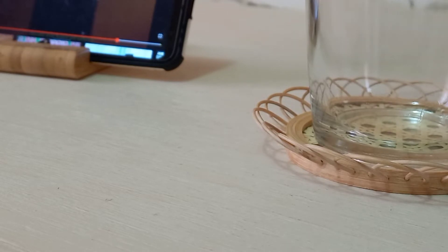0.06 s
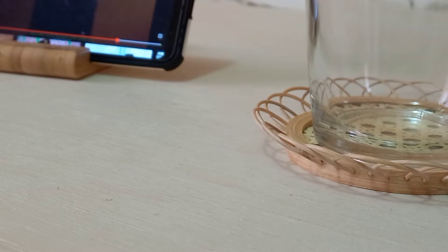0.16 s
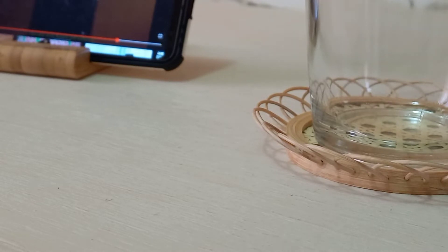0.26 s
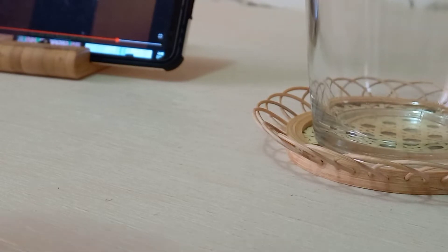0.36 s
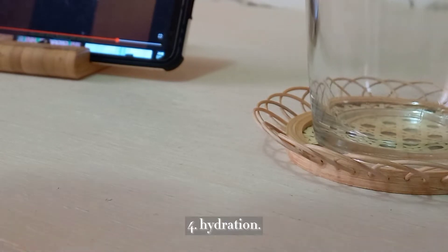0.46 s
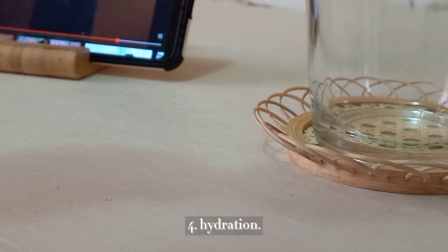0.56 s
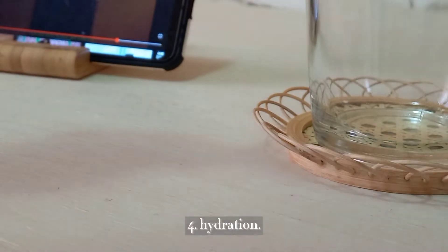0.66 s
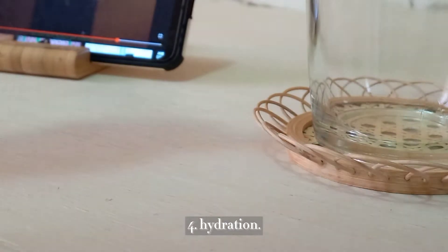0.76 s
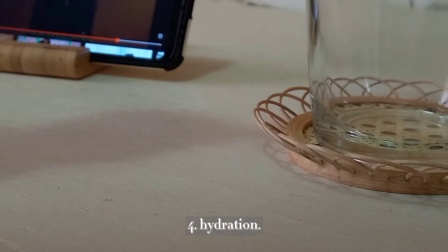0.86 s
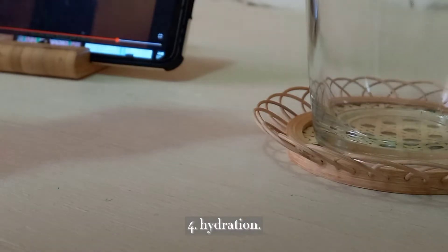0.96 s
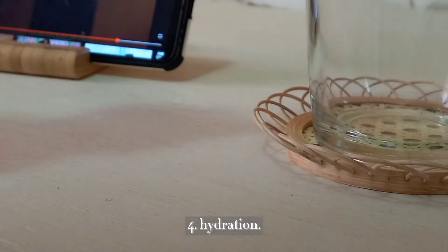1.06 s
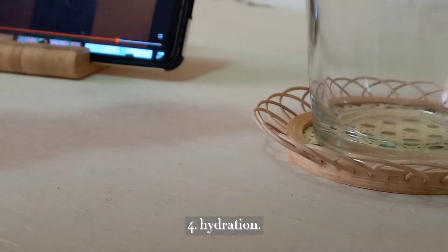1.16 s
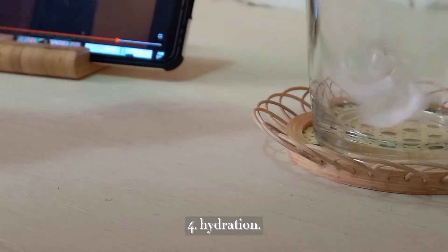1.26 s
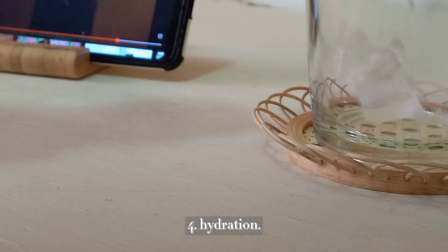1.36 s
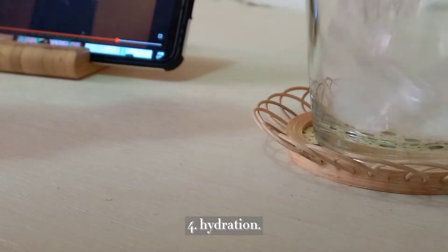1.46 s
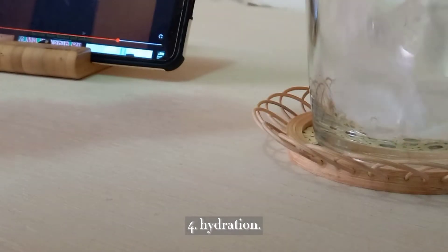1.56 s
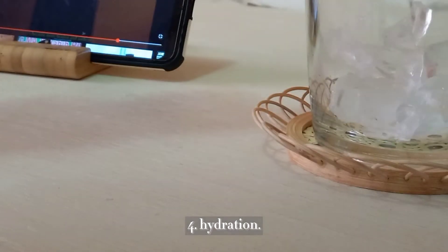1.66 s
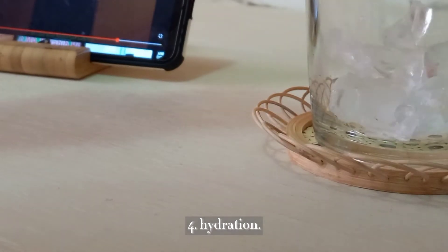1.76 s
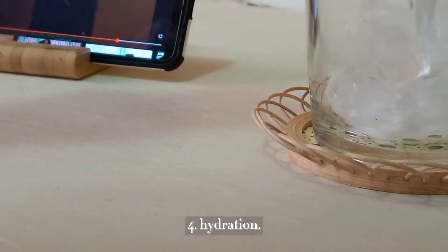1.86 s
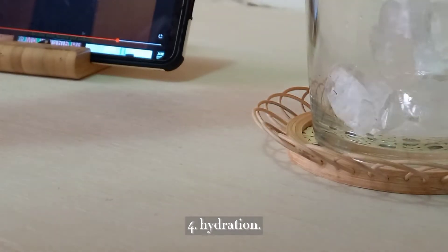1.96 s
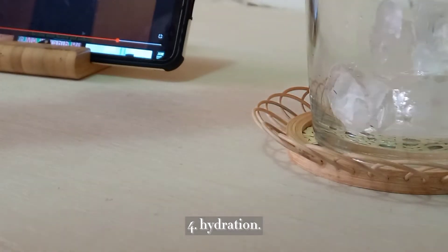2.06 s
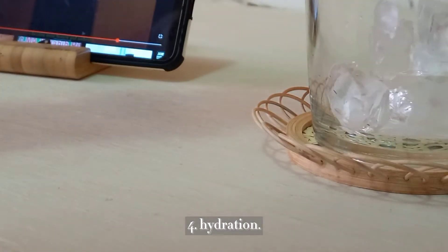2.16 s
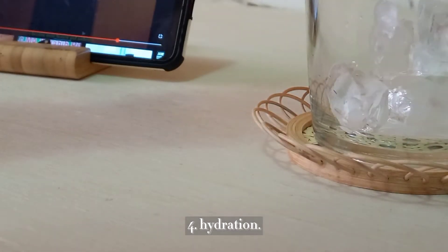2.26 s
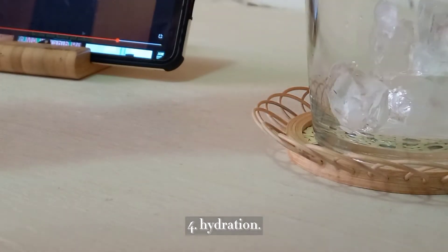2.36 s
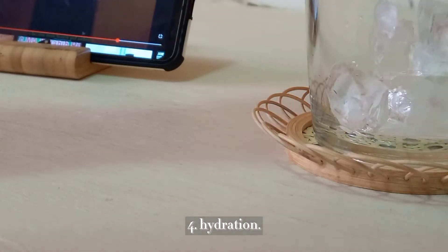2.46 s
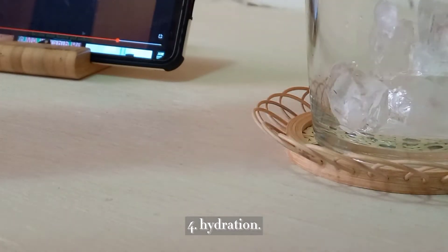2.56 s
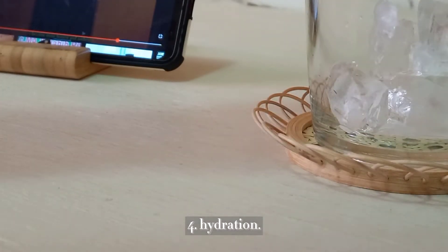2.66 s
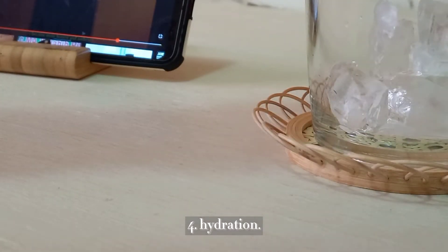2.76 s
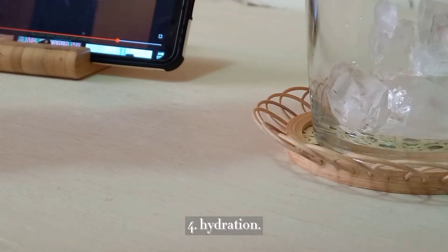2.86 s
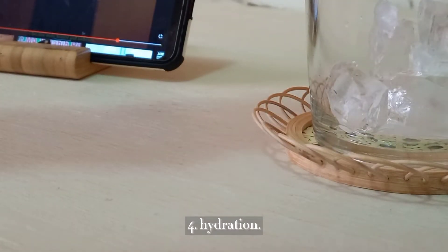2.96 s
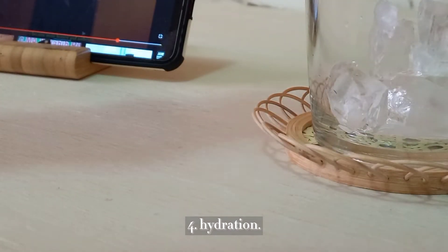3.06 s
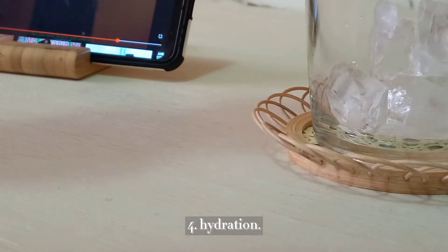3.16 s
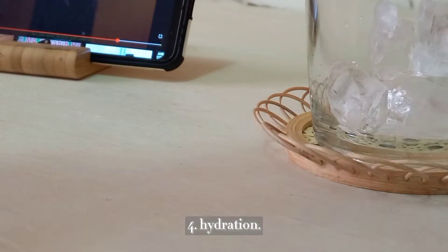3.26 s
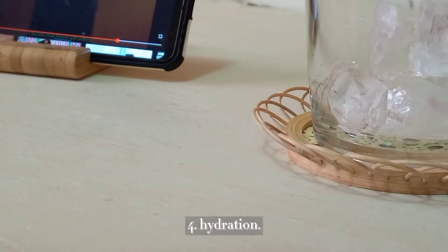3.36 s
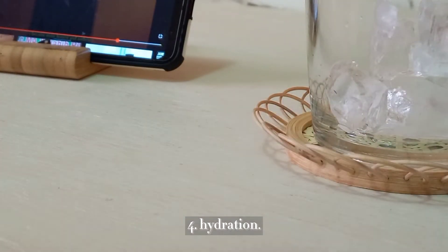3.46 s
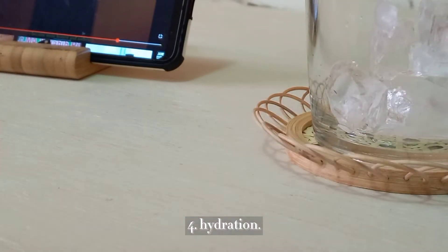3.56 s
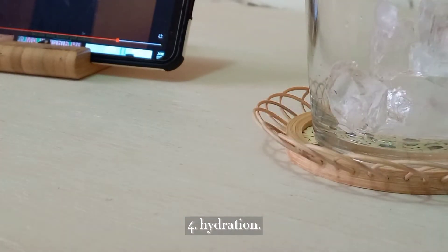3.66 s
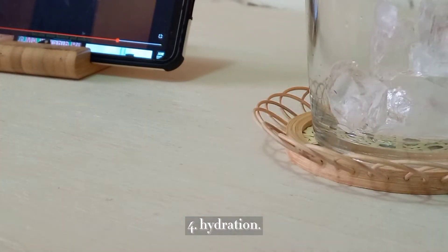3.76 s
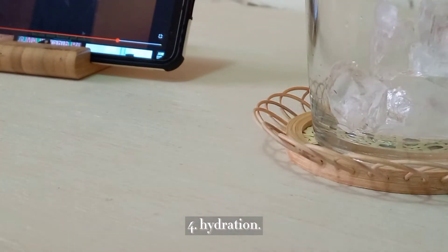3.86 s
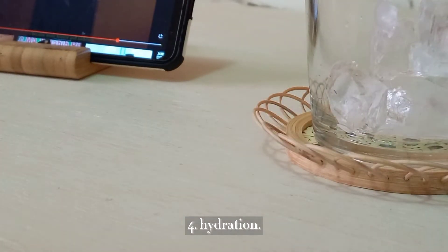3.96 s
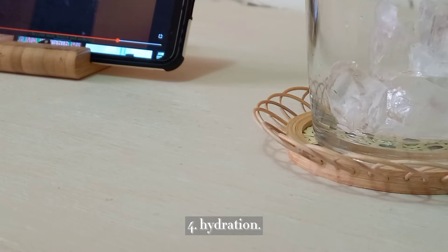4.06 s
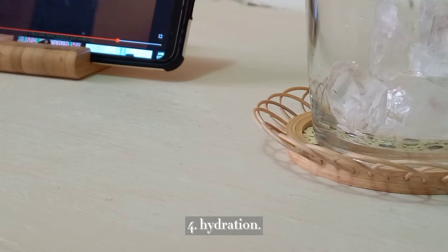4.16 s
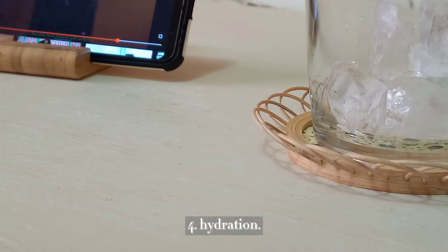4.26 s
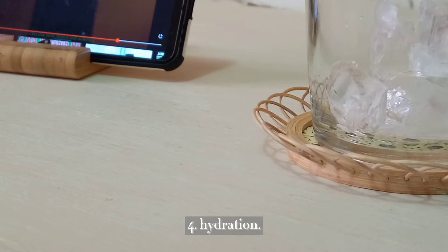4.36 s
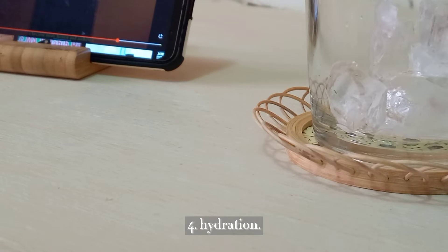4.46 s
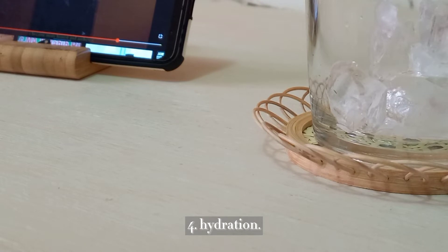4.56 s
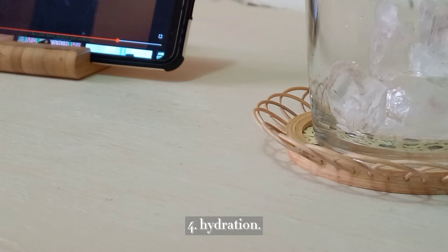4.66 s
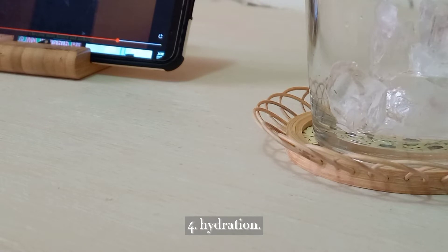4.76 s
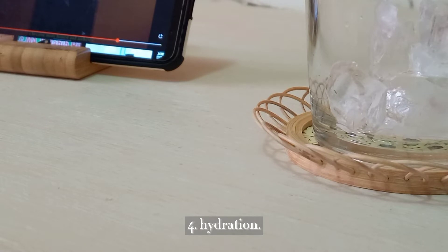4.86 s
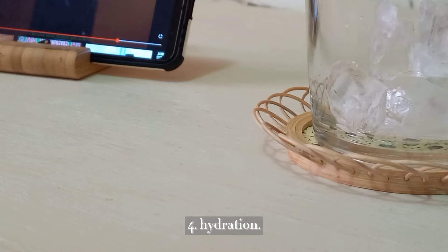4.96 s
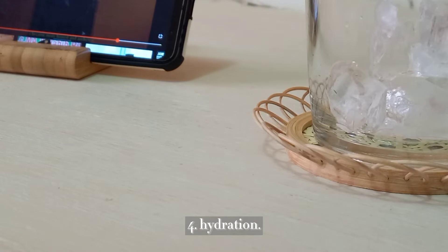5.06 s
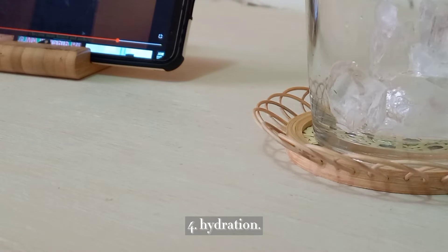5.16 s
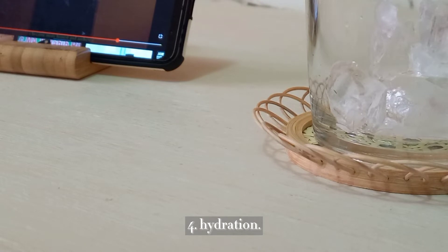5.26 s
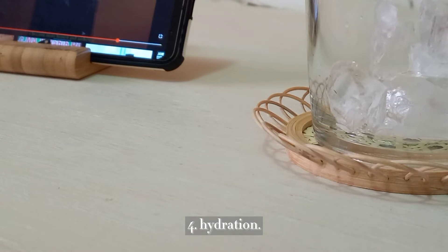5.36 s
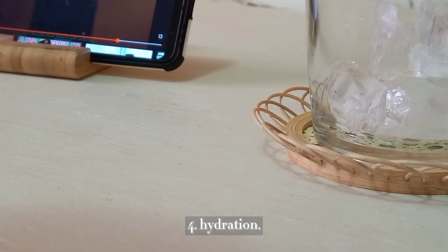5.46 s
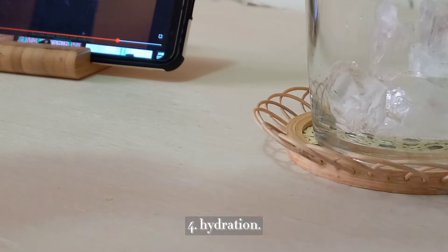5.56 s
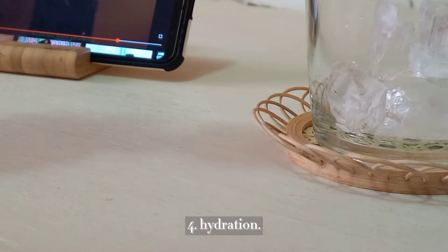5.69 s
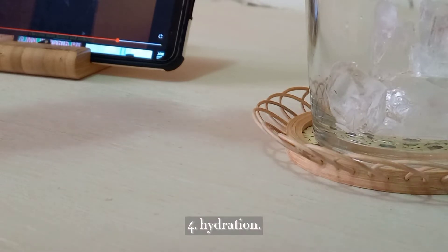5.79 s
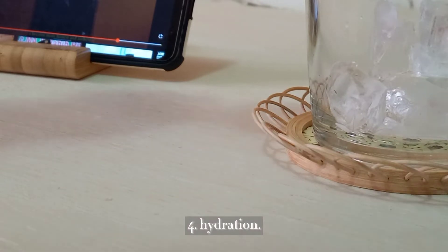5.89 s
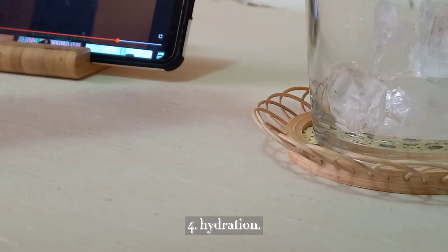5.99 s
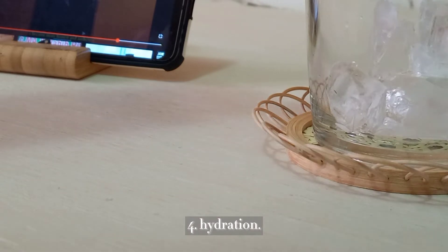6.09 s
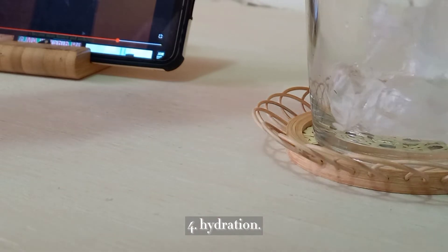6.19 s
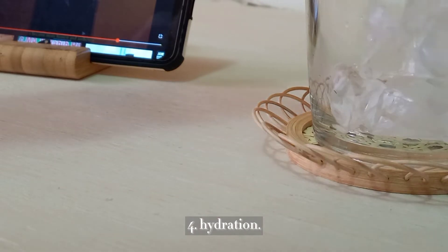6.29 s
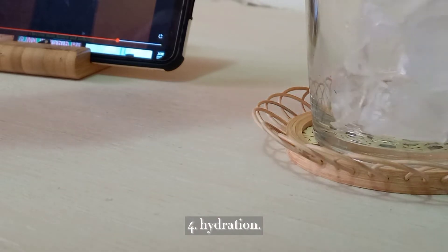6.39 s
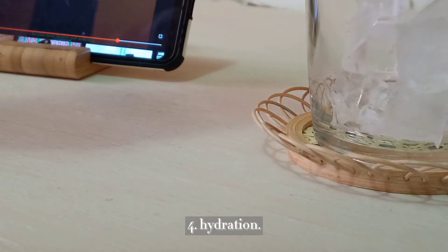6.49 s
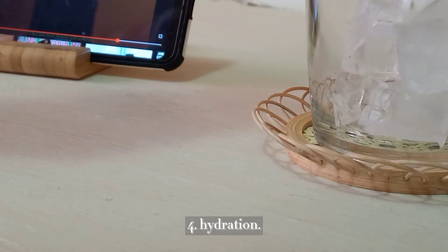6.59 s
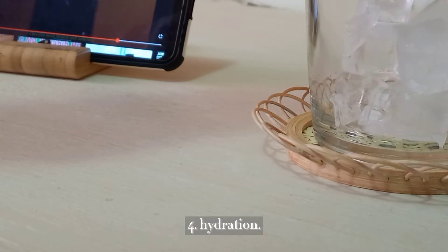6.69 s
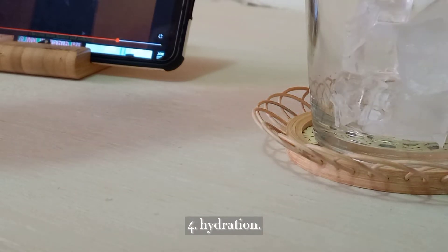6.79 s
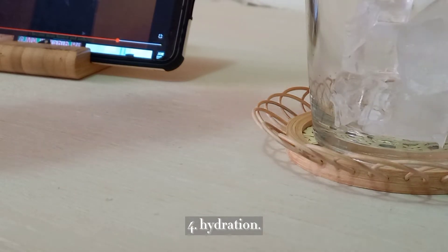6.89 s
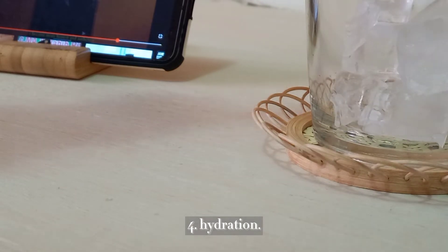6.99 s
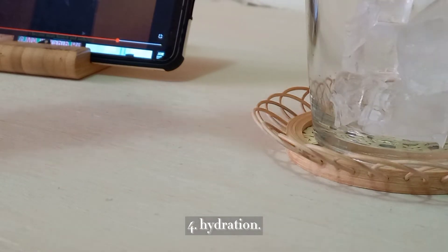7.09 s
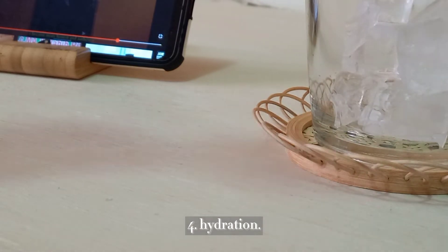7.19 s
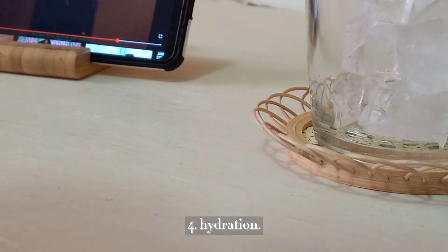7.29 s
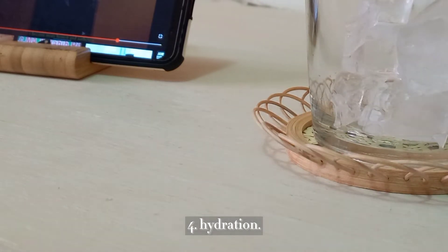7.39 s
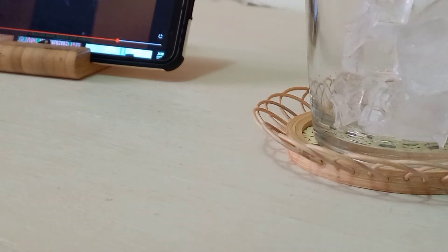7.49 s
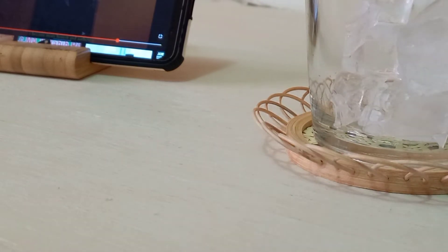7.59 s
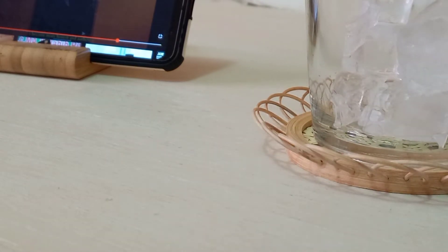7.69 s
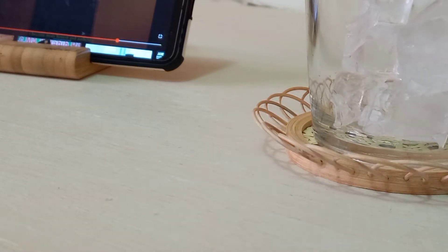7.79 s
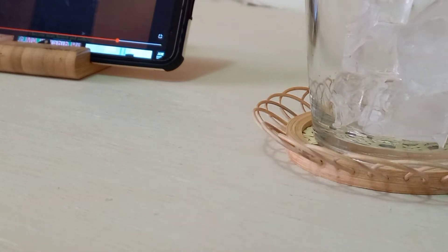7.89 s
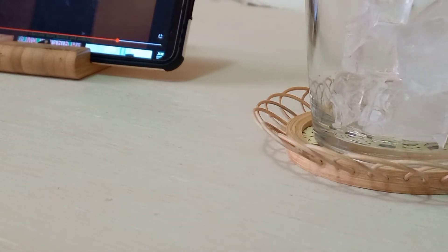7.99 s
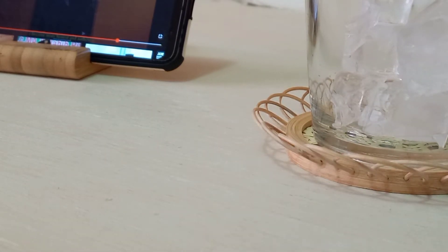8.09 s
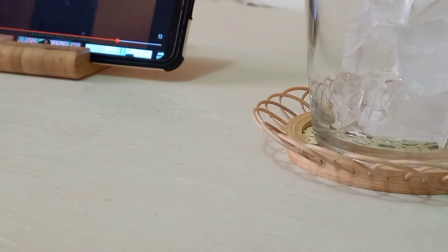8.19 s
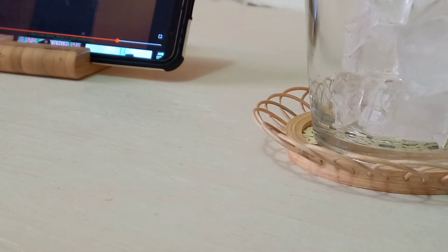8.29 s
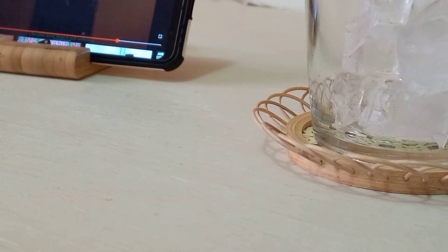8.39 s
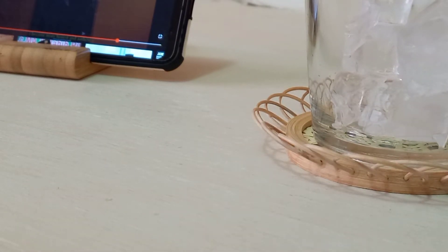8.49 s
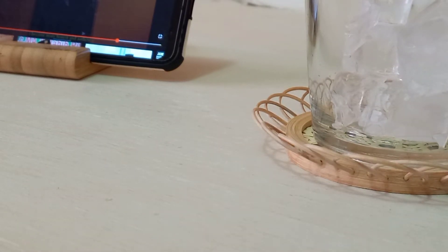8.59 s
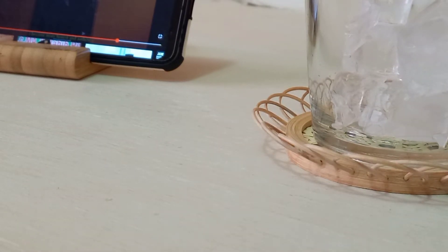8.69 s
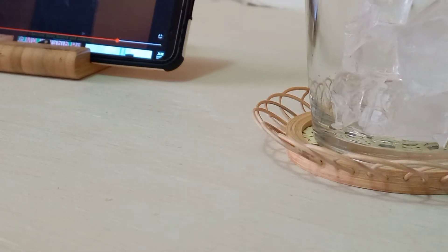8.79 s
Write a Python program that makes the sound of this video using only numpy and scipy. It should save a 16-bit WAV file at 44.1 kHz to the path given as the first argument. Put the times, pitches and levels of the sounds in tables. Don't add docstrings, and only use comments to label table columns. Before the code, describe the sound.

Very close in a quiet kitchen, a soft thud comes first, then a handful of ice cubes drops into a glass, with clear rings, knocks and a brief slide. After a pause, a scoop digs noisily in a plastic bin of ice. A second, shorter handful clinks into the glass, and near the end the scoop digs again. A faint refrigerator hum and room noise lie underneath.

```python
import sys
import numpy as np
from scipy import signal
from scipy.fft import rfft, irfft
from scipy.io import wavfile
from scipy.ndimage import uniform_filter1d

SR = 44100
rng = np.random.default_rng(int(sys.argv[2]) if len(sys.argv) > 2 else 0)


def magnitude_from_level(level_db):
    exponent = np.asarray(level_db, float) / 20
    return 10 ** exponent


def wav_record(signal):
    frames = np.transpose(np.atleast_2d(signal))
    bounded = np.clip(frames, -1, 1)
    quanta = np.round(bounded * 32767).astype(np.int16)
    wavfile.write(sys.argv[1], SR, quanta)


N = 389844


def at_hz(points, hz):
    table = np.array(points)
    return np.interp(np.log(hz), np.log(table[:, 0]), table[:, 1])


def in_time(tables):
    rows = []
    for table in tables:
        rows += [(table[0][0] - .01, -120), *table, (table[-1][0] + .03, -120)]
    return np.interp(np.arange(N) / SR, *np.transpose(rows))


def rms_one(x):
    return x / np.sqrt(np.mean(x ** 2) + 1e-20)


# (frequency [Hz], likeness [0-1])
LIKENESS = [(60, 0.93), (250, 0.93), (700, 0.54), (1500, 0.028), (12000, 0.035)]


def coloured(x, spectrum):
    hz = np.maximum(np.fft.rfftfreq(x.shape[1], 1 / SR), 1)
    mid, side = rfft(x) * magnitude_from_level(at_hz(spectrum, hz))
    alike = np.clip(at_hz(LIKENESS, hz), 0, 1)
    both = np.sqrt(1 + alike) * mid + np.sqrt(1 - alike) * side * [[1], [-1]]
    return rms_one(irfft(both, x.shape[1]))


def band(x, low_hz, high_hz):
    sos = signal.butter(2, [low_hz, high_hz], "band", fs=SR, output="sos")
    return rms_one(signal.sosfilt(sos, x))


def resonate(x, hz, width_hz):
    r, w = np.exp(-np.pi * width_hz / SR), 2 * np.pi * hz / SR
    return rms_one(signal.lfilter([1, 0, -1], [1, -2 * r * np.cos(w), r * r], x))


def pan(db):
    return magnitude_from_level([[db / 2], [-db / 2]])


def add(out, s, sound):
    i = round(s * SR)
    out[:, i:i + sound.shape[1]] += sound[:, :N - i]


# (frequency [Hz], level [dB])
FLOOR = [(44, -42), (80, -21), (110, 0.5), (165, -22.5), (270, -13), (450, -17.5), (1060, -16.5),
         (2000, -21.5), (2800, -34), (6000, -44.5), (16000, -47)]
# (time [s], level [dB])
MOTOR = [(0, -45.5), (1.9, -51.5), (2.8, -61), (3.6, -48), (5.6, -57), (6.2, -66), (7.3, -57), (8.84, -51)]
# (frequency [Hz], width [Hz], level [dB])
HUM = [(113.2, 11, -61), (454.6, 37, -66)]
FLOOR_DB, MOTOR_HZ = -54.5, 56


def background():
    t = np.arange(N) / SR
    out = magnitude_from_level(FLOOR_DB) * coloured(rng.standard_normal((2, N)), FLOOR)
    motor_db = np.interp(t, *np.transpose(MOTOR)) - 5.0
    out = out + magnitude_from_level(motor_db) * np.sin(2 * np.pi * MOTOR_HZ * t + np.array([[.2], [-.2]]))
    for hz, width_hz, db in HUM:
        out = out + magnitude_from_level(db) * band(rng.standard_normal(N), hz - width_hz / 2, hz + width_hz / 2)
    return out


# (time [s], level [dB], attack [s], t60 [s], rustle against thud [dB])
THUDS = [(-.05, -50.5, 0.018, 0.96, -15), (0.147, -44, 0.0073, 1.56, -8), (0.543, -27.5, 0.016, 0.78, -15),
         (2.605, -52, 0.0075, 3.6, -32.5), (1.6, -47, 0.014, 0.55, -46.5), (3.88, -44.5, 0.011, 0.64, -40),
         (7.9, -53, 0.017, 1.7, -42), (8.26, -58, 0.014, 1.5, -40), (8.39, -60, 0.0048, 3.1, -38),
         (1.83, -49, 0.044, 0.69, -39.5), (3.05, -54, 0.25, 2.7, -11.5)]
# (frequency [Hz], level [dB])
THUD = [(120, 0), (200, 6), (280, 9.5), (380, 5.5), (490, 1), (750, -6), (2000, 4.5), (15000, -22.5)]
# (frequency [Hz], width [Hz], level [dB])
THUD_RINGS = [(209.5, 68, -10.5), (279.3, 91, -6), (370, 99, -5.5), (475.6, 120, -4), (586, 230, -11),
              (740, 480, -12)]
HOLD_S, RUSTLE_HASTE = 0.034, 1.6


def thuds():
    low, rustle, t = 0, 0, np.arange(N) / SR
    for s, db, attack, t60, rustle_db in THUDS:
        rise = np.clip((t - s) / attack, 0, 1)
        fall_db = 60 * np.maximum(t - s - attack - HOLD_S, 0) / t60
        low = low + rise * magnitude_from_level(db - fall_db)
        rustle = rustle + rise * magnitude_from_level(db + rustle_db - RUSTLE_HASTE * fall_db)
    noise = coloured(rng.standard_normal((2, N)), THUD)
    body = band(noise, 74.0, 870)
    for hz, width_hz, db in THUD_RINGS:
        body = body + magnitude_from_level(db) * band(noise, hz - width_hz / 2, hz + width_hz / 2)
    return low * rms_one(body) + rustle * band(noise, 2400, 19000)


# (time [s], peak level [dB], frequency [Hz])
TABLE_BUMPS = [
    (0.949, -27, 124),
    (1.213, -39, 125),
    (1.407, -35.5, 127),
]
# (time [s], peak level [dB], frequency [Hz])
SETTLING = [(0.201, -31, 350), (0.601, -36, 268), (0.642, -32.5, 283), (2.607, -41, 280),
            (2.635, -37.5, 262), (2.666, -36, 301), (2.7, -40.5, 267), (2.74, -47, 290)]
BUMP_DB, BUMP_HZ = -15, (90, 139)


def table_bumps():
    out, t = np.zeros((2, N)), np.arange(SR // 3) / SR
    shakes = [(s, db + BUMP_DB, rng.uniform(*BUMP_HZ)) for s, db, _ in KNOCKS_ONE + KNOCKS_TWO]
    for s, db, hz in TABLE_BUMPS + SETTLING + shakes:
        boom = np.minimum(t / 0.0072, 1) * magnitude_from_level(db - 60 * t * hz / 26.0) * np.sin(2 * np.pi * hz * t)
        add(out, s, boom * np.ones((2, 1)))
    return out


# (frequency [Hz], t60 [s])
ROOM_T60 = [(150, 0.37), (600, 0.22), (3000, 0.24), (14000, 0.29)]


def room(x):
    t, edges = np.arange(SR // 2) / SR, 100 * 2 ** np.arange(0, 7.6, .75)
    tail = 0
    for low, high in zip(edges, edges[1:]):
        noise = band(rng.standard_normal((2, len(t))), low, high)
        tail = tail + noise * np.sqrt(high - low) * magnitude_from_level(-60 * t / at_hz(ROOM_T60, low))
    tail = coloured(tail * np.clip(t / 0.0035, 0, 1), [(20, 0), (20000, 0)])
    return signal.fftconvolve(x, tail / np.sqrt(np.sum(tail ** 2) / 2), axes=1)[:, :N]


CHIP_HZ, CHIP_CYCLES = (625, 7050), 39


def rattle(curves, colour, per_s, spread_db, t60, pan_db, body_db, bright_db, sharpens, chips_db):
    effort_db = in_time(curves)
    born = (rng.random(N) < per_s / SR) * magnitude_from_level(spread_db * np.minimum(rng.exponential(1, N), 4))
    envelope = signal.lfilter([1], [1, -magnitude_from_level(-60 / (t60 * SR))], born + 1e-9)
    bursts = rms_one(rng.standard_normal((2, N)) * envelope)
    dealt = rng.integers(0, 32, N)
    for k, hz in enumerate(np.geomspace(*CHIP_HZ, 16)):
        r, w = magnitude_from_level(-60 * hz / (CHIP_CYCLES * SR)), 2 * np.pi * hz / SR
        clicks = born * np.array([dealt == 2 * k, dealt == 2 * k + 1]) + 1e-18
        ring = signal.lfilter([np.sin(w)], [1, -2 * r * np.cos(w), r * r], clicks)
        bursts = bursts + magnitude_from_level(chips_db) * np.sqrt(hz / 2000) * ring
    grains = coloured(bursts, colour)
    high_db = effort_db + bright_db + sharpens * (effort_db + 32)
    body = magnitude_from_level(effort_db + body_db) * band(grains, 160, 2500)
    return (body + magnitude_from_level(high_db) * band(grains, 2100, 17000)) * pan(pan_db)


# (time [s], level [dB])
BIN_RATTLE = [
    [(3.58, -34), (3.63, -60), (3.66, -27), (3.8, -36), (3.9, -18.5), (4.0, -28.5), (4.245, -36.5)],
    [(4.27, -32.5), (4.5, -28.5), (4.85, -39.5), (5.12, -24.5), (5.28, -45.5), (5.4, -66)],
    [(7.87, -41.5), (8.08, -47.5), (8.15, -43.5), (8.215, -44), (8.27, -32), (8.4, -34.5), (8.62, -42),
     (8.66, -31.5), (8.84, -60.5)],
]
# (frequency [Hz], level [dB])
BIN = [(120, -22), (250, -31), (497, -2), (585, -13.5), (858, -4.5), (3610, 1), (6350, -17.5),
       (13400, -22.5), (15500, -28)]
BIN_SIDE_DB = 3.5


def bin_rattle():
    return rattle(BIN_RATTLE, BIN, per_s=400, spread_db=-0.5, t60=0.058, pan_db=BIN_SIDE_DB,
                  body_db=4.0, bright_db=1.0, sharpens=0.14, chips_db=-0.5)


def clack(db, body_hz, width_hz, broad, bright_db, top_hz, pan_db, rise, t60):
    t, (mid, side) = np.arange(1600) / SR, rng.standard_normal((2, 1600))
    sides = side * np.array([[1], [-1]])
    push = np.minimum(t / rise, 1) * magnitude_from_level(-60 * np.maximum(t - rise, 0) / t60)
    mid = mid + 1.58 * np.exp(-((t - rise) * SR / 5.05) ** 2)
    noise = push * (mid + 0.62 * sides)
    body = resonate(noise, body_hz, width_hz) + broad * band(noise, 0.48 * body_hz, 3000)
    crack = band(push ** 2 * (mid + sides), 1600, min(top_hz, .45 * SR))

    def peak(v):
        return np.sqrt(uniform_filter1d(v.mean(0) ** 2, size=90).max())

    return magnitude_from_level(db) * (body / peak(body) + magnitude_from_level(bright_db) * crack / peak(crack)) * pan(pan_db)


# (time [s], peak level [dB], body frequency [Hz])
BIN_CLACKS = [(3.5784, -14.5, 956), (3.581, -12.5, 1150), (3.6461, -12.5, 850), (3.6548, -17.5, 870),
              (3.675, -13, 870), (3.687, -19, 810), (3.737, -23, 1000), (3.753, -10, 1250), (3.889, -13, 1130),
              (3.936, -11, 905), (3.815, -22, 1490), (3.828, -15.5, 1110), (3.8477, -16.5, 435), (3.908, -7, 785),
              (3.9544, -38, 860), (4.0185, -14, 700), (4.0565, -41, 880), (4.0925, -38, 1010), (4.106, -18, 1160),
              (4.1444, -23, 910), (4.1788, -24.5, 600),
              (4.2519, -13.5, 1100), (4.287, -15.5, 820), (4.349, -14, 1060), (4.359, -11, 1630),
        (4.385, -20, 810), (4.408, -14, 1090), (4.4223, -12.5, 1310), (4.435, -19.5, 980),
        (4.481, -17, 1110), (4.498, -10, 1100), (4.517, -27, 1050), (4.493, -11, 1180), (4.5022, -5, 1090),
        (4.587, -12.5, 1000), (4.638, -11, 1300), (4.6692, -11, 670), (4.708, -18.5, 497),
        (4.7611, -20, 2340), (4.793, -27.5, 890), (4.8133, -24, 750), (4.84, -30, 1000),
              (4.8678, -24, 1140), (4.8873, -17.5, 1130), (4.9368, -15, 540), (4.944, -13, 1270),
        (5.0056, -12.5, 730), (5.0298, -8, 860), (5.061, -8.5, 870), (5.0705, -7.5, 560), (5.101, -7, 800),
        (5.117, -16, 800), (5.1294, -11, 740), (5.1589, -10, 813), (5.1699, -8, 910), (4.984, -23, 905),
        (5.189, -19, 796), (5.2206, -17, 985), (5.2603, -23, 740),
              (7.8649, -25, 1010), (7.8898, -21.5, 940), (7.9136, -24.5, 855), (7.953, -21.5, 905),
             (8.021, -22.5, 950), (8.147, -23.5, 1320), (8.2281, -18.5, 1800), (8.252, -13, 1360),
             (8.2655, -17.5, 910), (8.3359, -23, 746), (8.348, -12.5, 1010), (8.39, -10, 850),
             (8.397, -13, 590), (8.259, -14, 920), (8.4457, -20.5, 1680), (8.4663, -22, 890),
             (8.517, -22, 1150), (8.596, -23, 1430), (8.639, -11, 1230), (8.651, -20, 1090),
             (8.6866, -23, 1500), (8.7091, -19, 1920)]
# (time [s], peak level [dB])
SNAPS = [(3.843, -12), (3.854, -10), (3.912, -6.5), (3.981, -11), (4.025, -19), (4.036, -27), (4.073, -15),
         (4.198, -16), (4.268, -7), (4.346, -19), (4.365, -12), (4.446, -11), (4.469, -18), (4.5, -4),
         (4.533, -23), (4.578, -27), (4.587, -23), (4.623, -18), (4.667, -11), (4.886, -18.5), (4.966, -18),
         (5.028, -15), (5.071, -12), (5.112, -4), (5.158, 1.5), (5.188, -20), (5.22, -11), (7.934, -24),
         (7.964, -18.5), (8.053, -27), (8.101, -31), (8.164, -24), (8.194, -35), (8.248, -23), (8.384, -7),
         (8.638, -34)]
# (time [s], peak level [dB], frequency [Hz])
CRACKS = [(3.578, -37, 2800), (3.645, -45, 2720), (3.6504, -14, 2520), (3.674, -17, 2820),
          (3.738, -32.5, 3750), (3.7464, -14.5, 2510), (3.8142, -20, 4580), (3.828, -19, 2940),
          (3.8455, -17.5, 2640), (3.8938, -17, 2910), (3.9085, -2, 2930), (4.0156, -17.5, 3440),
          (4.102, -21, 2680), (4.142, -24.5, 2620), (4.1844, -23, 3550), (4.2494, -7.5, 2900),
          (4.3138, -14, 2510), (4.352, -16, 2650), (4.4046, -12, 2660), (4.4927, -10, 2600),
          (4.577, -25, 2610), (4.6224, -33, 2650), (4.656, -17, 3150), (4.6667, -10, 2720),
          (4.708, -23, 2510), (4.758, -39, 2500), (4.793, -30, 2540), (4.839, -23, 4290),
          (4.866, -23, 3310), (4.884, -14, 3630), (4.9378, -12.5, 2830), (4.9866, -36, 2850),
          (5.011, -12.5, 3900), (5.029, -29, 3800), (5.056, -20, 3350), (5.0705, -9, 2870),
          (5.0995, -8, 2520), (5.1578, -9, 3550), (5.221, -19, 3660),
          (7.8632, -17.5, 2550), (7.8886, -20.5, 3090), (7.9328, -28, 2880), (7.9984, -30, 3010),
                (8.011, -24.5, 2760), (8.053, -33, 3940), (8.148, -36, 2500), (8.228, -33, 2860),
                (8.2487, -15.5, 2640), (8.3321, -21, 2530), (8.3871, -13.5, 2470), (8.4613, -19.5, 2760),
                (8.4913, -37, 3210), (8.5945, -29, 2640), (8.6384, -9, 2550)]
CRACK_DB, CRACK_SPREAD_DB = -24, 2.5


def scoops():
    out = np.zeros((2, N))
    for s, db, hz in BIN_CLACKS:
        pan_db = (BIN_SIDE_DB if s < 6 else .5) + rng.normal(0, 1.5)
        bright_db = CRACK_DB + CRACK_SPREAD_DB * rng.normal()
        add(out, s - .002, clack(db - 6.0, hz, 113, 1.0, bright_db, 13000, pan_db, rise=0.0011, t60=0.02))
    for s, db in SNAPS:
        hz = rng.uniform(660, 1330)
        add(out, s, clack(db - 9.0, hz, 460, 0.64, -10.0, 7360, 0.83, rise=0.00037, t60=0.012))
    for s, db, hz in CRACKS:
        add(out, s - .0005, clack(db - 13.5, hz, 740, 0.53, -7.0, 14500, .1, rise=0.001, t60=0.03))
    return out


# (time [s], level [dB])
GLASS_RATTLE = [
    [(.8, -56), (.93, -40), (.96, -35.5), (1.07, -39.5), (1.1, -36), (1.195, -40.5), (1.21, -30.5),
     (1.33, -32), (1.4, -29), (1.5, -34.5), (1.56, -41), (1.6, -29), (1.68, -48.5), (1.785, -56),
     (1.8, -45.5), (1.85, -39.5), (1.97, -47), (2.05, -69.5)],
    [(5.55, -59.5), (5.67, -49.5), (5.8, -71.5), (6.03, -46.5), (6.14, -54), (6.17, -40.5), (6.3, -35),
     (6.42, -42.5), (6.7, -72.5)],
]
# (frequency [Hz], level [dB])
CLACK = [(250, -11), (700, -23.5), (1080, -9), (1600, -12.5), (2600, 3), (3600, -12.5), (6500, -23),
         (10500, -27.5), (13000, -18.5), (15500, -26.5)]


def sliding_ice():
    return rattle(GLASS_RATTLE, CLACK, per_s=420, spread_db=2.5, t60=0.025, pan_db=-1.0,
                  body_db=2.5, bright_db=3.0, sharpens=0.084, chips_db=-5.5)


# (start [s], end [s])
IN_GLASS_S = [
    (.945, 2.1),
    (6.145, 6.8),
]
CHATTER_DB = [-3.5, -12.5, -14]
CHATTER_WIDTH_HZ = [90, 140, 140]


def chatter(sliding):
    out = 0
    for k, hz in enumerate(WALL_HZ):
        level_db = CHATTER_DB[min(k, 2)] + WALL[k][0]
        out = out + magnitude_from_level(level_db) * resonate(sliding, hz, CHATTER_WIDTH_HZ[min(k, 2)])
    inside_db = in_time([[(start, 0), (end, 0)] for start, end in IN_GLASS_S])
    return out * np.std(sliding) * magnitude_from_level(inside_db)


# (time [s], peak level [dB], brightness against body [dB])
KNOCKS_ONE = [(0.92, -31, -3), (0.948, -20, 0), (1.009, -31, -10), (1.037, -33, 3), (1.059, -42.5, 7.5),
              (1.106, -27, -2), (1.088, -24, -13), (1.206, -11, -11), (1.241, -33.5, -13.5),
              (1.281, -18.5, -3), (1.362, -24, -6.5), (1.382, -20, 5), (1.399, -16.5, -11.5),
              (1.425, -16, -4), (1.508, -23.5, -1.5), (1.523, -24, -4), (1.548, -27, -2), (1.59, -33.5, 15),
              (1.612, -27.5, -9), (1.791, -24, -11), (1.798, -25.5, -9), (1.867, -27.5, -12)]
KNOCKS_TWO = [(6.15, -27, 3), (6.18, -32, 14), (6.202, -28, 9), (6.24, -26, 0), (6.2722, -26.5, 4),
              (6.283, -25.5, 8), (6.312, -24, 4), (6.344, -27.5, 13), (6.404, -29, 0), (6.4135, -28.5, 7),
              (6.213, -32, -2), (6.359, -27, -6), (6.384, -31, -13)]
COLUMN_HZ = [1000, 1150]
# (time [s], peak level [dB], frequency [Hz])
PINGS = [
    (1.088, -24.5, 2160),
    (1.284, -28.5, 3500),
]
# (time [s], peak level [dB])
TICKS = [(.413, -55.5), (2.64, -64), (5.389, -58.5), (0.7282, -49), (0.843, -49), (0.8647, -49.5),
         (1.728, -50), (5.5937, -56), (5.6413, -38), (5.679, -48), (0.8245, -55), (5.5288, -64),
         (5.7338, -56.5), (5.8051, -56.5), (5.8785, -56), (5.893, -50), (5.9134, -50), (5.9832, -52.5),
         (6.0104, -41.5), (6.0292, -46)]
WALL_TICK_DB = -19.5


def knocks():
    out = np.zeros((2, N))
    for s, db, bright_db in KNOCKS_ONE + KNOCKS_TWO:
        hz = COLUMN_HZ[int(s > 4)] * rng.uniform(1.0, 1.093)
        knock = clack(db - 8.5, hz, 120, 0.05, bright_db + .1, 7500, -1.5, rise=0.0014, t60=0.024)
        add(out, s - .0005, knock)
    for s, db, hz in PINGS:
        add(out, s, clack(db, hz, 270, 0.13, -16.0, 14000, -1.3, rise=0.000339, t60=0.083))
    for s, db, *_ in DROP_ONE + DROP_TWO:
        tick = clack(db + WALL_TICK_DB, 2500, 2200, 0.14, 0.1, 11000, -0.81, rise=0.00039, t60=0.008)
        add(out, s, tick)
    for s, db in TICKS:
        hz = rng.uniform(4200, 6000)
        add(out, s - .0005, clack(db - 7.5, hz, 830, 0.22, 3.0, 22000, 0.53, rise=0.00066, t60=0.061))
    return out


# (time [s], peak level [dB])
BASE_HITS = [(1.106, -41.5), (1.2064, -35), (1.2173, -24.5), (1.284, -39), (1.3406, -33.5), (1.387, -24),
             (1.4113, -27), (1.509, -35.5), (1.5704, -41)]
BASE_HZ = [3010, 3920, 5250, 8480, 8560, 12170, 12645, 13350, 14560, 14800]
# (level [dB], t60 [s])
BASE = [(-11.5, .032), (-17, .024), (-11, 0.13), (-10.5, 0.068), (-11, .07), (0, .05), (-4, 0.066),
        (-11.5, .035), (-3, .05), (-11.5, 0.044)]


def glass_base():
    out, t = np.zeros((2, N)), np.arange(SR // 5) / SR
    for s, db in BASE_HITS:
        for hz, (rel_db, t60), (spread, turn) in zip(BASE_HZ, BASE, rng.random((len(BASE), 2))):
            level_db = db + rel_db + 5.29 + 5.5 * spread
            angle = 2 * np.pi * hz * t + np.array([[0], [4.7 * turn]])
            add(out, s, magnitude_from_level(level_db - 60 * t / t60) * np.sin(angle))
    return out


# (time [s], lowest ring level [dB], its t60 [s], second ring against it [dB], high rings against it [dB])
DROP_ONE = [(0.95, -29.5, 0.18, -21, 0.5), (1.12, -32.5, 0.25, -16, -13), (1.139, -23.5, 0.42, -11, -9),
            (1.211, -23, 1, -13, -33.5), (1.288, -23, 0.43, -29, -27.5), (1.3444, -11, 0.34, -34, -15),
            (1.364, -16, 0.16, -11.5, -26.5), (1.388, -21, 0.96, -6, -12), (1.4076, -9.5, 0.15, -11, -18),
            (1.476, -23.5, 0.35, -32, -26), (1.512, -26.5, 0.41, -24, -37), (1.571, -14, 0.21, -7.5, -12.5),
            (1.597, -22.5, 0.15, -9, -22), (1.832, -33, 0.09, 2.5, 7.5), (1.8441, -17.5, 0.062, -14, -18),
            (1.868, -27, 0.087, -32, -13), (1.884, -22.5, 0.032, -35, -31), (1.914, -31, 0.034, -16, -17),
            (1.945, -35.5, 0.029, -21, -15), (1.985, -52, 0.11, -22, -23), (2.411, -66, 0.31, -5, 6),
            (2.7044, -56, 0.11, -7, -16.5)]
DROP_TWO = [(6.152, -27.5, 0.26, 4, -6), (6.1875, -19.5, 0.16, -2.5, 1), (6.2408, -14.5, 0.22, -4, -2),
            (6.2827, -14.5, 0.27, -5.5, 3), (6.3147, -21, 0.085, -2, -13), (6.345, -14.5, 0.12, -1, -1.5),
            (6.359, -33, 0.12, 5, 3), (6.3826, -47.5, 0.72, 11, -1), (6.434, -16.5, 0.049, -12, -9.5),
            (6.496, -34, 0.046, -5, -3), (6.533, -35, 0.024, -16, -17), (6.5788, -35.5, 0.023, -11, -7),
            (6.6102, -41, 0.031, -12, -19)]
WALL_HZ = [1966, 4607, 7980, 8074, 8140, 8500, 11750, 11870, 12176, 12346, 13600, 14300, 14507, 15200]
# (level [dB], t60 as share of the lowest [1])
WALL = [(1.5, 0.33), (3.5, 0.23), (0, 0.34), (-7.5, 0.34), (-9.5, .15), (-4.5, 0.11), (-10, 0.13),
        (-14, 0.56), (-10, 0.12), (-14.5, 0.81), (-15, 0.067), (-28, .25), (-13.5, .35), (-23.5, .08)]
# (time [s], left-right of the lowest ring [dB], of the others [dB])
WALL_SIDE = [(1.3, 0.5, -4.5), (1.6, -3.5, -7), (6.148, -17, -6.5), (6.5, -6.5, -3.5)]
SECOND_T60_S = [.14, .06]
HANDOVER_S = .001
CHOKE_T60_S = 0.2


def glass_wall():
    out, hits = np.zeros((2, N)), DROP_ONE + DROP_TWO
    side_s, *side_db = np.transpose(WALL_SIDE)
    t = np.arange(SR // 3) / SR
    for (s, db, t60, second_db, high_db), after in zip(hits, hits[1:] + [(N / SR,)]):
        draw = rng.random((14, 3))
        blow_db = np.r_[0, second_db, high_db + 12.0 * (draw[2:, 2] - .5)]
        blow_db[6:] += 0.21 * (db + 17)
        touched = np.maximum(t - (after[0] - s), 0)
        replaced, choked = np.clip(1 - touched / HANDOVER_S, 0, 1), magnitude_from_level(-60 * touched / CHOKE_T60_S)
        edges = np.clip(t / HANDOVER_S, 0, 1) * np.array([replaced, choked])
        for k, (hz, (rel_db, share)) in enumerate(zip(WALL_HZ, WALL)):
            detuned_hz = hz * (1 + 0.004 * (draw[k, 0] - .5) * (k > 1))
            lobes = 0.81 + min(k, 3) * (draw[k, 1] - .5)
            angle = 2 * np.pi * (detuned_hz * (t + s) + draw[k, 0] * (k > 0))
            angle = angle + np.array([[-1], [1]]) * lobes
            shortest = 0.049 * share + 0.035 * (k > 1) + SECOND_T60_S[int(s > 2)] * (k == 1)
            life = max(t60 * (share if k else 1), shortest)
            level = magnitude_from_level(db + blow_db[k] + rel_db - 60 * t / life)
            place = pan(np.interp(s + .01, side_s, side_db[min(k, 1)]))
            add(out, s, edges[min(k, 1)] * level * place * np.sin(angle))
    return out


def scene():
    ring = glass_wall() + glass_base()
    near, far = knocks(), scoops()
    wet = room(magnitude_from_level(-5.0) * far)
    wet += room(magnitude_from_level(-3.5) * near + magnitude_from_level(-11) * ring)
    far = far + bin_rattle()
    far = np.array([far[0], np.roll(far[1], 4)])
    sliding = sliding_ice()
    return ring + near + far + wet + sliding + chatter(sliding) + thuds() + table_bumps() + background()


def low_pass(x):
    return signal.sosfilt(signal.butter(12, 16640, fs=SR, output="sos"), x)


def record(dry):
    dry = np.array([dry[0], np.roll(dry[1], 2)])
    dry = signal.sosfilt(signal.butter(6, 44, "high", fs=SR, output="sos"), dry)
    dry = .93 * np.tanh(dry / .93)
    dry = signal.sosfilt(signal.cheby2(12, 60, 16600, fs=SR, output="sos"), dry)
    return low_pass(dry)


dry = scene()
out = record(dry)
wav_record(out)
```